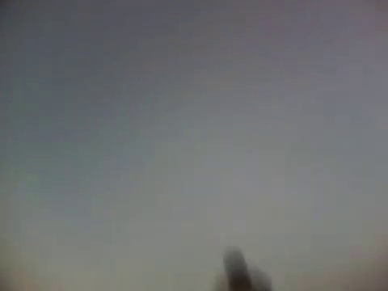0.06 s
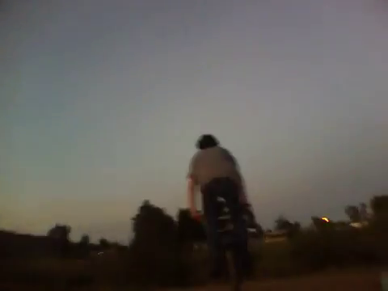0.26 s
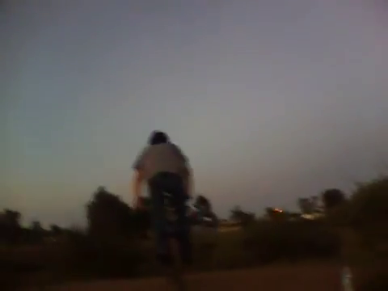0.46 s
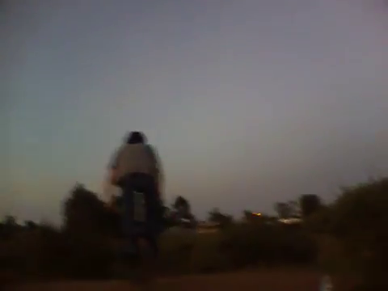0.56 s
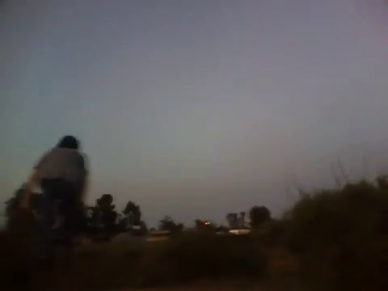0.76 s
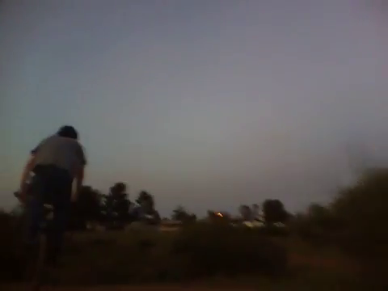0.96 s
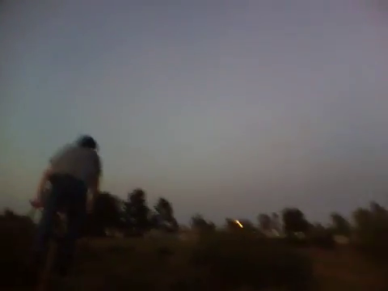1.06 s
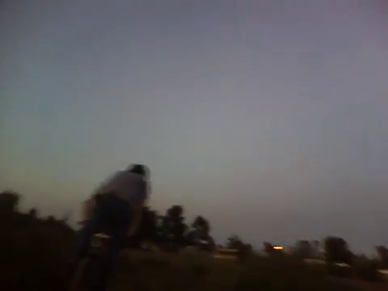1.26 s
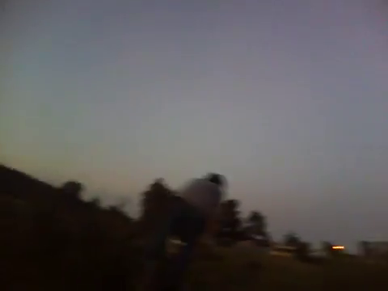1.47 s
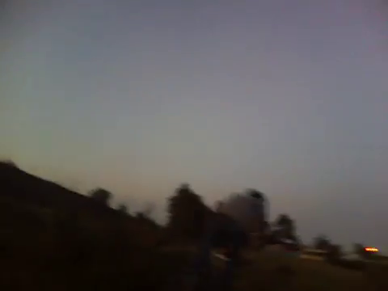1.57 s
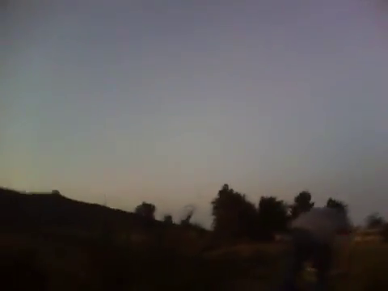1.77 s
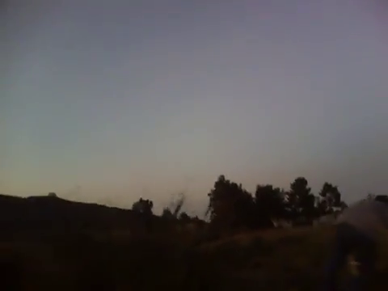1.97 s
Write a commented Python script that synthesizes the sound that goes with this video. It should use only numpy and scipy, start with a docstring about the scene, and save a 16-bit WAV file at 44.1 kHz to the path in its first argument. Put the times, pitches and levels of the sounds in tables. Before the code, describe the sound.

A bike rides rough ground: a loud distorted knock, then chain slaps and hollow mount rattle

```python
"""A camera clamped to a bicycle on a dirt trail takes a hard jolt: blows ring its body until the input clips.
Grit and bumps under the tyres shake the clamp into a hollow hum, and the chain slaps the ringing frame.
Loose parts chatter in clumps of ticks, and small stones ping off the spokes as long, fluttering rings.
Lumps of the trail thump the tyres into a dull rumble, over a flickering bed of low noise and hiss."""
import sys
import numpy as np
from scipy import signal
from scipy.io import wavfile

SR = 44100
rng = np.random.default_rng(int(sys.argv[2]) if len(sys.argv) > 2 else 0)


def level_to_linear(level):
    """Convert decibel levels to linear amplitude factors, elementwise."""
    exponent = np.asarray(level, float) / 20
    return 10 ** exponent


def wrap_up_sound(samples):
    """Save the sound to the file named by the first command line argument, as 16-bit audio."""
    columns = np.atleast_2d(samples).T
    # keep every value between -1 and 1, then stretch to whole-number steps
    tamed = np.clip(columns, -1, 1)
    steps = np.round(tamed * 32767).astype(np.int16)
    wavfile.write(sys.argv[1], SR, steps)


N = 88200

# The jolt, a cluster of blows on the camera body.
# Each row: start in seconds, drive level in dB, centre of the ring in Hz, crack level in dB.
JOLT_BLOWS = [(0.204, 17.5, 1525, -34), (0.2056, 18, 970, -41), (0.2134, 10, 2180, 1),
              (0.2164, 4.5, 1920, -19.5), (0.2209, 12.5, 1650, -18), (0.226, -13, 2200, -20),
              (0.2398, -14.5, 2200, -63), (0.2547, -6.5, 2150, -16), (0.273, -4, 2200, -26)]
# Ringing modes of the camera body. Each row: frequency in Hz, relative level in dB, 60 dB decay in seconds.
BODY_MODES = [(745, -10.5, 0.078), (850, -7, 0.021), (997, 6.5, 0.024), (1325, -2.5, 0.018),
              (1466, 7.5, 0.0094), (1710, 4.5, 0.0082), (1975, 2.5, 0.013), (2200, 2, 0.013),
              (2478, -6, 0.029), (3670, 12, 0.0043)]
# The mount rocking after the first blow. Each row: frequency in Hz, level in dB, 60 dB decay in seconds.
ROCKING_MODES = [(111.5, -11, 0.073), (212.3, -13.5, 0.11), (587.6, -2.5, 0.11), (863, -31, 0.75)]
# Roughness of the trail, heard as clamp hum. Each row: time in seconds, hum level in dB.
TRAIL_ROUGHNESS = [(0, -37.5), (.19, -39), (.25, -24.5), (.36, -32), (.45, -27.5), (.5, -37.5), (.6, -25.5),
                   (.67, -34), (.73, -27), (.85, -27), (.9, -32.5), (.96, -31), (1.07, -27), (1.19, -35),
                   (1.27, -38.5), (1.33, -28), (1.415, -23), (1.45, -31), (1.58, -30), (1.69, -36.5),
                   (1.76, -32.5), (1.8, -34.5), (1.9, -34), (2, -30.5)]
# Bumps that knock the clamp. Each row: start in seconds, drive level in dB.
TRAIL_BUMPS = [(0.028, -39), (0.111, -16), (0.124, -16.5), (0.277, -20), (0.316, -21.5), (0.387, -17.5),
               (.452, -21.5), (0.528, -21), (0.574, -21.5), (0.692, -21), (.718, -23), (0.809, -22),
               (.94, -19.5), (1.025, -18.5), (1.059, -19), (1.142, -20), (1.212, -23), (1.374, -10),
               (1.471, -19), (1.539, -49), (1.566, -18), (1.62, -19.5), (1.656, -20.5), (1.709, -19),
               (1.745, -20.5), (1.837, -21.5), (1.895, -20), (1.945, -35)]
# Modes of clamp and handlebar. Each row: frequency in Hz, relative level in dB, 60 dB decay in seconds.
CLAMP_MODES = [(560.3, -1, 0.056), (600.9, 2.5, 0.078), (625.6, 0, 0.024), (1022, -23.5, 0.15),
               (1286, -12.5, 0.084), (1412, -11, 0.04), (1704, -17, 0.05)]
# Chain slaps on the frame. Each row: start in seconds, drive level in dB, pitch of the struck spot in Hz.
CHAIN_SLAPS = [(0.109, -30.5, 2400), (0.15, -28, 2400), (0.2988, -20, 3070), (0.306, -21.5, 2700),
               (0.3322, -15.5, 1990), (0.3544, -24.5, 2510), (0.3924, -30, 2700), (0.4586, -24, 2680),
               (0.5272, -21, 2680), (0.5942, -29, 2850), (0.663, -28, 2860), (0.6932, -26.5, 2480),
               (0.7604, -15.5, 2460), (0.7818, -23, 3000), (0.8159, -15, 3050), (0.8499, -24.5, 3400),
               (0.8662, -15.5, 3630), (0.9155, -17, 3670), (0.9397, -25.5, 3200), (0.9652, -19.5, 3380),
               (1.0179, -14.5, 2380), (1.048, -21, 2300), (1.068, -22, 2560), (1.0984, -44, 3140),
               (1.1196, -17.5, 2770), (1.1454, -25, 2700), (1.1727, -25.5, 2730), (1.2789, -20.5, 3000),
               (1.3578, -25.5, 3150), (1.417, -19, 3120), (1.4676, -19.5, 2340), (1.5189, -23, 3160),
               (1.5708, -25.5, 3130), (1.6032, -24, 2600), (1.628, -27.5, 3080), (1.6398, -34, 3080),
               (1.6622, -21.5, 3100), (1.678, -33.5, 2840), (1.7102, -34.5, 3000), (1.7365, -24.5, 1790),
               (1.8008, -29.5, 2460), (1.8412, -27.5, 2520), (1.915, -23, 3260), (1.9764, -25.5, 3120)]
# Frame tubes under the chain. Each row: frequency in Hz, relative level in dB, 60 dB decay in seconds.
FRAME_TUBES = [(2346, -15.5, 0.045), (2513, -3.5, 0.026), (2700, -1, 0.021), (3097, 0, 0.026),
               (3385, -4.5, 0.024), (3728, -7.5, 0.046), (4690, 1.5, 0.035), (5760, -3.5, .02)]
# Loose parts chattering, loudest after the jolt. Each row: time in seconds, level in dB before the mix gains.
CHATTER_LEVEL = [(0, -50.5), (.19, -58.5), (.27, -43.5), (.295, -35), (.35, -39), (.4, -47), (.44, -55),
                 (.72, -52), (.8, -45.5), (1.1, -48), (1.22, -48.5), (1.45, -50), (1.68, -50.5),
                 (1.8, -53.5), (2, -52)]
# Average tone of the dry ticks. Each row: frequency in Hz, relative level in dB per Hz.
CHATTER_SPECTRUM = [(710, -88), (1200, 1.5), (1310, 1), (1530, -0.5), (2620, -1), (4310, -10.5),
                    (6500, -17), (15000, -66)]
# Stones on the first set of spokes. Each row: start in seconds, drive level in dB.
LONG_SPOKE_PINGS = [(.0398, -34)]
# Modes of those spokes. Each row: frequency in Hz, relative level in dB, 60 dB decay in seconds.
LONG_SPOKE_MODES = [(1500, 6.5, 0.016), (2422, 1, 0.3), (3040, -1.5, 0.08), (3730, 1, 0.11),
                    (4620, -6, 0.07), (5800, 1, 0.027), (6810, -12.5, 0.09)]
# Stones on the second, shorter set. Each row: start in seconds, drive level in dB.
SHORT_SPOKE_PINGS = [(.4813, -38), (1.8587, -48)]
# Modes of the shorter spokes. Each row: frequency in Hz, relative level in dB, 60 dB decay in seconds.
SHORT_SPOKE_MODES = [(2856, 1, 0.45), (3370, 0, 0.06), (4080, -1.5, 0.1), (4900, -7, 0.05)]
# Rumble of the tyres over time. Each row: time in seconds, level in dB.
RUMBLE_LEVEL = [(0, -49.5), (.15, -37.5), (.5, -51.5), (.62, -44.5), (.72, -43), (.92, -37.5),
                (1.25, -51.5), (1.45, -41.5), (1.6, -40.5), (2, -51)]
# Resonances of the rumble. Each row: frequency in Hz, relative level in dB, 60 dB decay in seconds.
TYRE_MODES = [(92, 2.5, 0.055), (130, 4, 0.044), (224, -1, 0.45), (271, 4.5, 0.044)]
# Average spectrum of the flickering tyre noise and microphone hiss.
# Each row: frequency in Hz, relative level in dB per Hz.
FLOOR_SPECTRUM = [(25, -12.5), (200, -8), (380, -12), (800, -3), (1300, -59), (1900, -30), (3000, -28),
                  (7000, -33), (16000, -30)]

BLOW_WIDTH_OCT, JOLT_CRACK_T60_S = 0.66, 0.0039
GRIT_PER_S, GRIT_SPREAD_DB = 360, 2.5
BUMP_LOW_HZ, BUMP_HIGH_HZ, BUMP_EDGE_DB = 444, 773, -4
LINKS_S, LINK_LOSS_DB, LINK_CUT_HZ = 0.0016, 5, 10000
SLAP_T60_S, SLAP_TAIL_DB = 0.011, -6
SLAP_LOW_DB, CRACK_DB, TREBLE_DB, TREBLE_GROWS = -9.5, -17.5, -23.5, 0.91
FRAME_DB, STRIKE_WIDTH_OCT, TUBE_SPREAD_DB = -10.5, 0.39, 3
CHATTER_PER_S, CHATTER_CLUMP_DB = 1500, 2.5
SPOKE_FLUTTER_DB = 2.5
LUMPS_PER_S, LUMP_SPREAD_DB = 300, 2.5
FLOOR_DB, FLOOR_PATCHY_DB = -42, -5
MIC_LOW_HZ, CLIP_TOP = 83.6, 1.0


def jolt():
    """Each blow rings the body modes near its own centre and cracks; the first one rocks the mount."""
    s, db, centre_hz, crack_db = np.transpose(JOLT_BLOWS)
    body = 0
    for k, (hz, level_db, t60) in enumerate(BODY_MODES):
        off_centre = np.log2(hz / centre_hz) / BLOW_WIDTH_OCT
        blow_db = db + level_db - 13.5 - 5.24 * off_centre ** 2
        body = body + ring(clicks(s, (-1) ** k * level_to_linear(blow_db)), hz, t60)
    body = band(body, 613, 5900)
    rocking = sum(ring(clicks(s[:1], level_to_linear(level_db)), hz, t60) for hz, level_db, t60 in ROCKING_MODES)
    crack_noise = rms_one(band(rng.standard_normal(N), 2080, 6200))
    cracks = dying(clicks(s, level_to_linear(crack_db)), JOLT_CRACK_T60_S) * crack_noise
    return body + rocking + cracks


def clamp():
    """Grit under the tyres and single soft bumps set the clamp humming; each bump has a small hard edge."""
    grit = grains(GRIT_PER_S, GRIT_SPREAD_DB)
    hum = rms_one(band(struck(grit, CLAMP_MODES), 344, 1510))
    s, drive_db = np.transpose(TRAIL_BUMPS)
    push = clicks(s, level_to_linear(drive_db))
    edge = level_to_linear(BUMP_EDGE_DB) * band(push, 1000, 2130)
    knocks = band(push, BUMP_LOW_HZ, BUMP_HIGH_HZ) + edge
    return hum * level_to_linear(in_time(TRAIL_ROUGHNESS)) + struck(knocks, CLAMP_MODES)


def chain():
    """Four links per slap ring tubes near the struck pitch over noise cracks; hard slaps are brighter."""
    s, db, centre_hz = np.transpose(CHAIN_SLAPS)
    link = np.arange(4)
    at = (s[:, None] + LINKS_S * link * rng.uniform(.4, 2.4, (len(s), 4))).ravel()

    def links(slap_db):
        """Each link in the count strikes weaker than the one before."""
        return clicks(at, level_to_linear((slap_db[:, None] - LINK_LOSS_DB * link).ravel()))

    treble_db = TREBLE_DB + TREBLE_GROWS * (db - db.mean())
    out = 0
    for low_hz, high_hz, own_db, t60 in [(1150, 1580, SLAP_LOW_DB, 0.43 * SLAP_T60_S),
                                         (1980, 4400, CRACK_DB, SLAP_T60_S),
                                         (4900, 6600, treble_db, 0.37 * SLAP_T60_S)]:
        hits = links(db + own_db)
        envelope = dying(hits, t60) + level_to_linear(SLAP_TAIL_DB) * dying(hits, 5 * t60)
        out = out + envelope * rms_one(band(rng.standard_normal(N), low_hz, high_hz))

    spread_db = TUBE_SPREAD_DB * rng.normal(0, 1, (len(s), len(FRAME_TUBES)))
    for k, (hz, level_db, t60) in enumerate(FRAME_TUBES):
        near_db = np.maximum(-6 * (np.log2(hz / centre_hz) / STRIKE_WIDTH_OCT) ** 2, -16)
        out = out + ring(links(db + near_db + spread_db[:, k] + level_db + FRAME_DB), hz, t60)
    return signal.sosfilt(signal.butter(2, LINK_CUT_HZ, fs=SR, output="sos"), out)


def chatter():
    """Ticks of loose parts come in clumps, dry and each ringing one tube; the tubes' balance keeps changing."""
    ticks = grains(CHATTER_PER_S * level_to_linear(CHATTER_CLUMP_DB * drift(25)), 3.0)
    dry_ticks = coloured([ticks, ticks], CHATTER_SPECTRUM, patchy_db=4.0)
    dealt = rng.integers(len(FRAME_TUBES), size=N)  # the tube each tick rings
    rung = 0
    for k, (hz, db, t60) in enumerate(FRAME_TUBES):
        own_ticks = ticks * (dealt == k) * level_to_linear(2.5 * drift(6.8)) + 1e-18
        rung = rung + level_to_linear(db) * ring(own_ticks, hz, t60)
    return level_to_linear(in_time(CHATTER_LEVEL)) * (1.3 * dry_ticks + 0.96 * rms_one(rung))


def spokes():
    """Stones flick the spokes; the ring flutters as the wheel shakes."""
    out = 0
    for pings, modes in [(LONG_SPOKE_PINGS, LONG_SPOKE_MODES), (SHORT_SPOKE_PINGS, SHORT_SPOKE_MODES)]:
        s, db = np.transpose(pings)
        out = out + struck(clicks(s, level_to_linear(db)), modes)
    return out * level_to_linear(SPOKE_FLUTTER_DB * drift(51))


def rumble():
    """Lumps of the trail thump the tyres, as random low pushes into a few deep resonances."""
    thumps = band(grains(LUMPS_PER_S, LUMP_SPREAD_DB), 33, 290)
    return level_to_linear(in_time(RUMBLE_LEVEL)) * rms_one(struck(thumps, TYRE_MODES))


def floor():
    """Tyre noise and microphone hiss: shaped noise whose bands flicker, the low ones most."""
    return level_to_linear(FLOOR_DB) * coloured(rng.standard_normal((2, N)), FLOOR_SPECTRUM, FLOOR_PATCHY_DB)


def struck(x, modes):
    """A body of modes in parallel, signs alternating."""
    return sum((-1) ** k * level_to_linear(db) * ring(x, hz, t60) for k, (hz, db, t60) in enumerate(modes))


def ring(x, hz, t60):
    """A unit click sets a dying sine of starting height 1 ringing."""
    r, w = level_to_linear(-60 / (t60 * SR)), 2 * np.pi * hz / SR
    return signal.lfilter([0, np.sin(w)], [1, -2 * r * np.cos(w), r * r], x)


def dying(x, t60):
    """Each click becomes an envelope that dies away by 60 dB in t60 seconds."""
    return signal.lfilter([1], [1, -level_to_linear(-60 / (t60 * SR))], x)


def clicks(s, size):
    """Single-sample clicks at the given seconds."""
    out = np.zeros(N)
    np.add.at(out, np.minimum((np.asarray(s) * SR).astype(int), N - 1), size)
    return out + 1e-18


def grains(per_s, spread_db):
    """Clicks at random moments, of random size and sign."""
    sizes = level_to_linear(spread_db * np.minimum(rng.exponential(1, N), 5)) * rng.choice([-1, 1], N)
    return sizes * (rng.random(N) < per_s / SR) + 1e-18


def coloured(source, spectrum, patchy_db):
    """Half-octave bands, each with its own level and flicker, partly shared; rms 1."""
    hz_points, db_points = np.transpose(spectrum)
    together = drift(13.0)
    edges = 22 * 2 ** np.arange(0, 10, .5)
    out = 0
    for k, (low, high) in enumerate(zip(edges, edges[1:])):
        db = np.interp(np.log(low * high) / 2, np.log(hz_points), db_points)
        flicker_db = patchy_db * (400 / high) ** 0.45 * (0.4 * together + drift(43))
        out = out + level_to_linear(db + flicker_db) * band(source[k % 2], low, high)
    return rms_one(out)


def drift(rate):
    """Slow random wander of rms 1, low-passed near rate Hz and drawn at every 40th sample."""
    r = np.exp(-80 * np.pi * rate / SR)
    steps = rng.standard_normal(N // 40 + 2002)
    slow = signal.lfilter([1], [1, -2 * r, r * r], steps)[2000:]  # skip the filter's settling
    return np.interp(np.arange(N) / 40, np.arange(len(slow)), rms_one(slow))


def band(x, low_hz, high_hz):
    """Band-pass filter."""
    sos = signal.butter(2, [low_hz, min(high_hz, .45 * SR)], "band", fs=SR, output="sos")
    return signal.sosfilt(sos, x)


def in_time(rows):
    """Straight lines in dB between the rows of a level table."""
    s, db = np.transpose(rows)
    return np.interp(np.arange(N) / SR, s, db)


def rms_one(x):
    """Scales to rms 1."""
    return x / np.sqrt(np.mean(x ** 2) + 1e-20)


def scene():
    """All layers summed into one channel."""
    return (jolt() + clamp() + chain() + chatter() + spokes() + rumble() + floor())[None]


def band_limit(x):
    """A steep low-pass at the top of the band."""
    return signal.sosfilt(signal.butter(12, 16390, fs=SR, output="sos"), x)


def record(dry):
    """The microphone cuts the deep bass, then the input clips hard."""
    heard = signal.sosfilt(signal.butter(2, MIC_LOW_HZ, "high", fs=SR, output="sos"), dry)
    return band_limit(np.clip(heard, -CLIP_TOP, CLIP_TOP))


dry = scene()
out = record(dry)
wrap_up_sound(out)
```